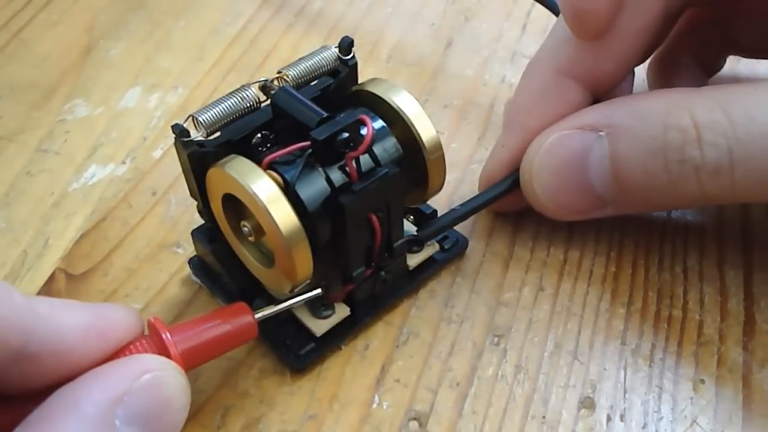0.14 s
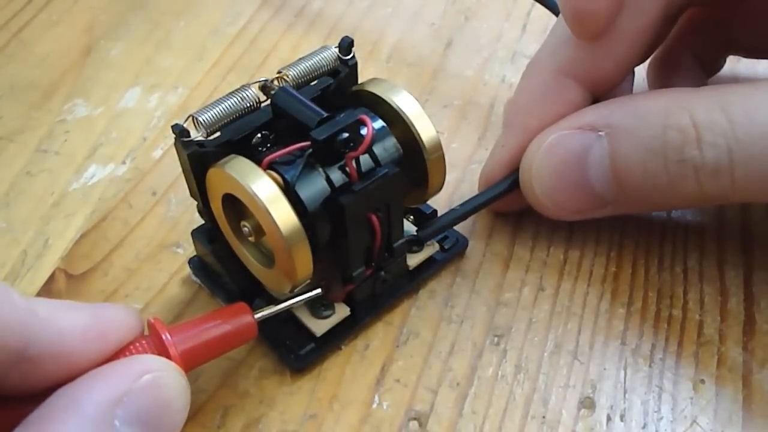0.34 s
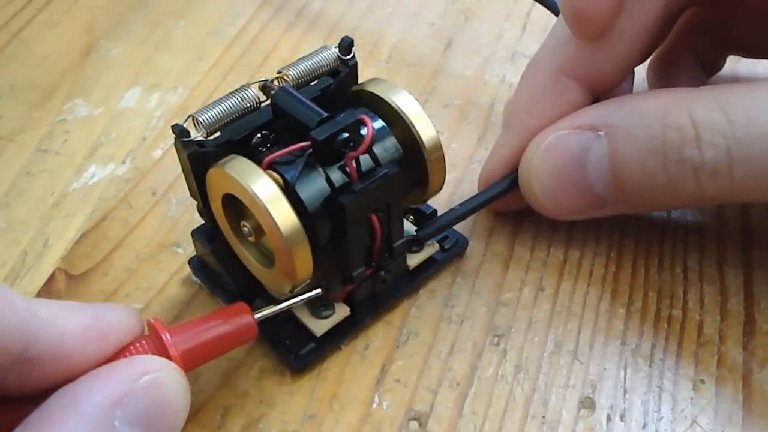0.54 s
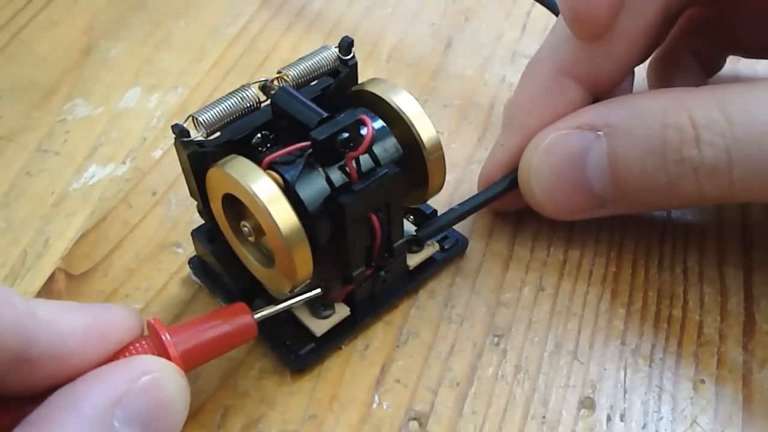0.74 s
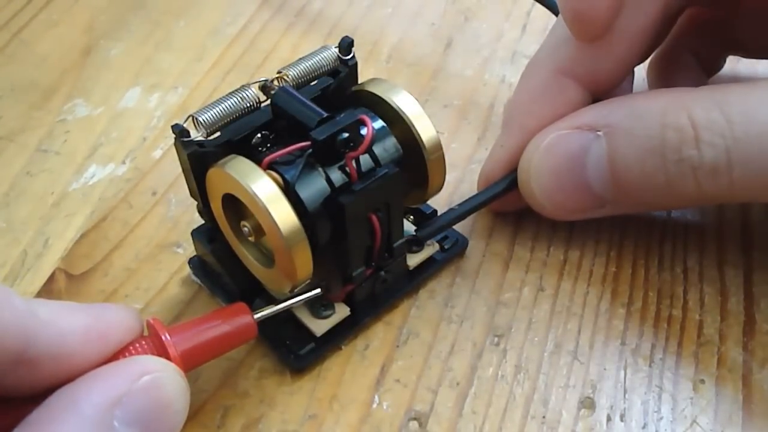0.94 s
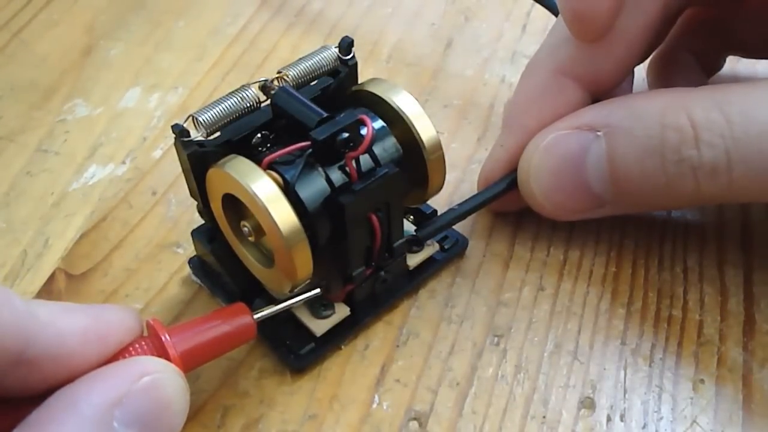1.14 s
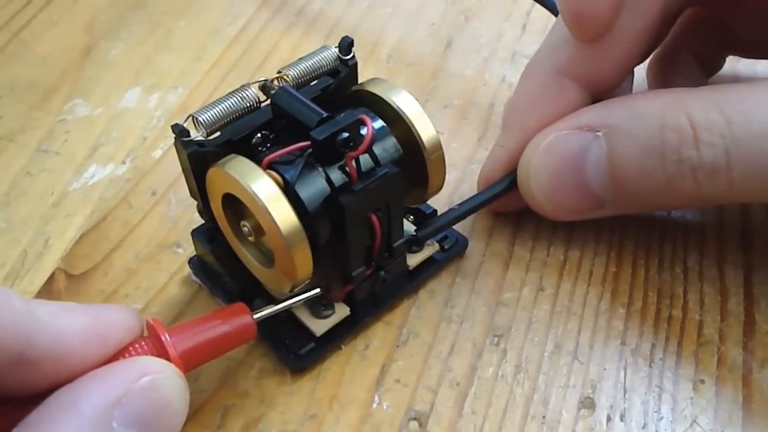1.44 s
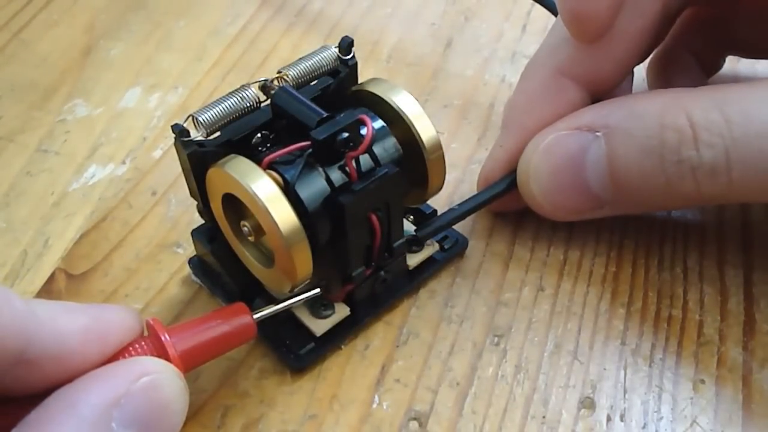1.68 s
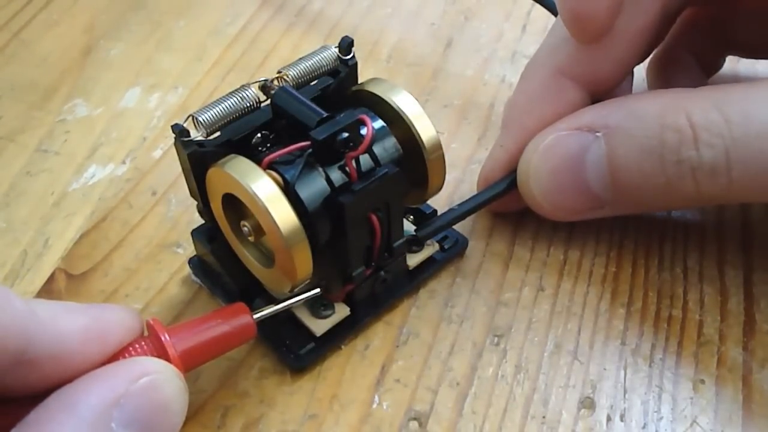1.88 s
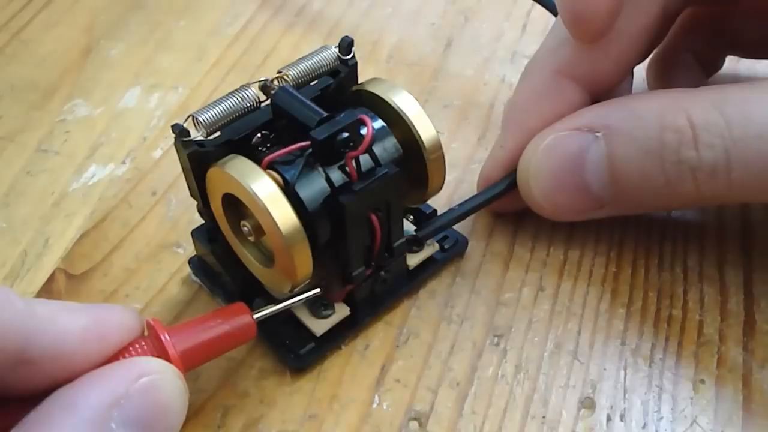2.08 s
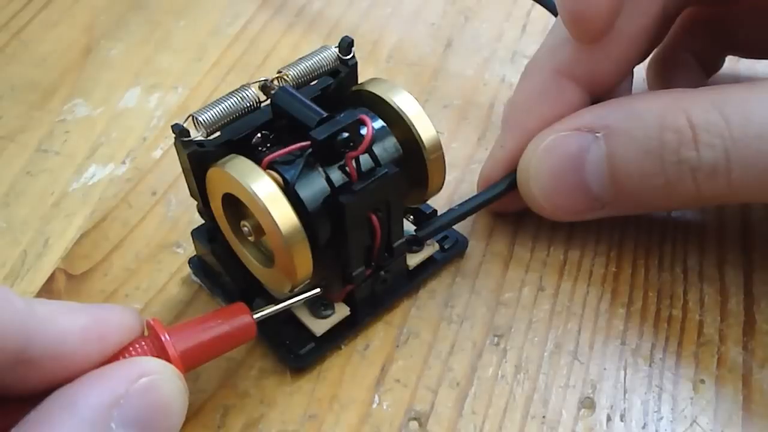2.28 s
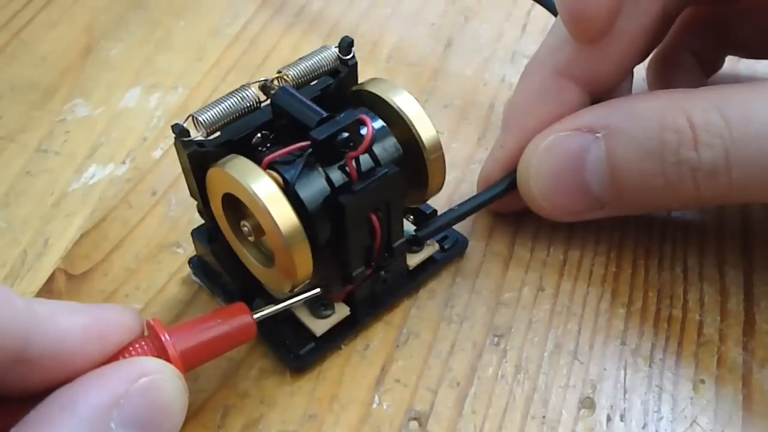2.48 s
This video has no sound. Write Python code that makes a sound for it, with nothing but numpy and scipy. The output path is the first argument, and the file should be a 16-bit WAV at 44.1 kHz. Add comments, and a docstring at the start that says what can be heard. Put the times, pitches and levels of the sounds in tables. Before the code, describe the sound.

High, scratchy whirr of a small electric motor gradually speeding up on a wooden table.

```python
"""A small twin electric motor, fed through hand-held probes, spins up two brass flywheels on a wooden table.
From the start the bearings rumble and the brushes chatter once a turn. As the rotors gain speed, their
shaft orders climb through the resonances of frame and table, and the commutator's grain gives the brush
rasp broad rising bands that flare as they cross the ringing of the metal near 6 kHz. Near 1.7 s the fast
rotor's second order swells to its peak, then recedes while both rotors go on accelerating."""
import sys
import numpy as np
from scipy import signal
from scipy.fft import rfft, irfft, next_fast_len
from scipy.io import wavfile
from scipy.ndimage import map_coordinates

SR = 44100
rng = np.random.default_rng(int(sys.argv[2]) if len(sys.argv) > 2 else 0)


def inscribe(sig):
    """Save sig as 16-bit PCM at rate SR to the path in sys.argv[1].

    A 1-D sig is mono; a 2-D sig holds one channel per row.
    Samples are clipped to [-1, 1] before scaling.
    """
    pcm = np.round(np.clip(np.atleast_2d(sig).T, -1, 1) * 32767)
    wavfile.write(sys.argv[1], SR, pcm.astype(np.int16))


N = 115542


def amp(db):
    """Decibels to amplitude ratio."""
    return 10 ** (np.asarray(db) / 20)


def unit(x):
    """Normalisation to rms 1."""
    return x / np.sqrt(np.mean(x ** 2) + 1e-20)


def along(points, hz):
    """Interpolation on a logarithmic frequency axis."""
    f, v = np.transpose(points)
    return np.interp(np.log(hz + 1), np.log(f + 1), v)


def curves(rows):
    """Linear interpolation in time, one curve per value column."""
    times, *columns = np.transpose(rows)
    return [np.interp(np.arange(N) / SR, times, c) for c in columns]


def wobble(rate):
    """Smooth random modulation, rate knots a second."""
    return map_coordinates(rng.standard_normal(4096), [np.arange(N) * rate / SR], mode="wrap")


def filtered(x, response):
    """Linear filtering: the spectrum times a frequency response."""
    m = next_fast_len(N + SR // 2)
    return irfft(rfft(x, m) * response(np.fft.rfftfreq(m, 1 / SR)), m)[:N]


def coloured(x, spectrum):
    """Spectral shaping by (Hz, dB) points, at rms 1."""
    return unit(filtered(x, lambda hz: amp(along(spectrum, hz))))


def resonate(x, modes):
    """Resonance: steep-sided modes ring on after each burst, at rms 1."""
    def response(f):
        power = sum(amp(db) ** 2 / (1 + ((f - hz) / width) ** 2) ** 2 for hz, width, db in modes)
        high_pass = f ** 2 / (f ** 2 + 1500 ** 2)
        cepstrum = irfft(np.log(power * high_pass + 1e-12))
        cepstrum[0] = cepstrum[len(cepstrum) // 2:] = 0  # minimum phase, hence causal
        return np.exp(rfft(cepstrum))
    return unit(filtered(x, response))


def room(x, t60_s=0.14):
    """Reverberation: a small room's diffuse tail decays exponentially."""
    t = np.arange(SR // 3) / SR
    tail = rng.standard_normal(len(t)) * amp(-60 * t / t60_s)
    return signal.fftconvolve(x, tail / np.linalg.norm(tail))[:N]


# Bearing rumble. Each row: time in seconds, level in dB.
RUMBLE_LEVEL = [(0.0, -41), (0.07, -44), (0.31, -40), (0.69, -45), (0.86, -42.5), (0.92, -42.5),
                (2.57, -48), (2.62, -47.5)]
# Its spectrum. Each row: frequency in Hz, relative level in dB.
RUMBLE_SPECTRUM = [(25, -33), (40, -25), (55, -21), (75, -23), (100, -10), (200, -12), (320, -7),
                   (420, -5.5), (550, 0.5), (800, 1.5), (1000, -4.5), (1200, 2.5), (1400, 7), (1700, -4),
                   (1920, 1.5), (2150, -2), (2500, 3), (3500, -34.5)]

def bearings():
    """Structure-borne sound: rolling noise is carried into the table top."""
    return amp(curves(RUMBLE_LEVEL)[0]) * coloured(rng.standard_normal(N), RUMBLE_SPECTRUM)


# Shaft orders of each rotor. Each row: multiple of the rotation rate, relative level in dB.
SLOW_ROTOR_ORDERS = [(3, -56.5), (4, -78), (6, -57), (9, -56), (12, -64.5), (18, -61)]
FAST_ROTOR_ORDERS = [(1, -54), (4, -59), (5, -52.5), (6, -61), (7, -56.5), (8, -66)]
# Radiation from frame and table. Each row: frequency in Hz, gain in dB.
FRAME_RESPONSE = [(165, -7), (220, -16), (240, -9), (255, -4), (275, -7), (350, -10), (410, 3), (455, -7),
                  (500, 6), (530, 6), (550, -1), (610, -2), (650, 5), (720, -3), (830, 1), (880, 0),
                  (935, 3), (990, -11), (1110, 1), (1220, -1), (1280, -5), (1430, 2), (1610, -1),
                  (1660, -11), (2100, -9), (3500, 1)]

def rotor(speed_hz, orders, reference_hz, flutter_db, wander_rad):
    """Forced vibration: shaft harmonics grow with speed and radiate through the frame's resonances."""
    angle = 2 * np.pi * np.cumsum(speed_hz) / SR + wander_rad * wobble(20)
    drive_db = 8 * np.log2(speed_hz / reference_hz)  # 8 dB per octave
    sound = np.zeros(N)
    for order, db in orders:
        level_db = db + drive_db + along(FRAME_RESPONSE, order * speed_hz) + flutter_db * wobble(18)
        sound += np.sqrt(2) * amp(level_db) * np.sin(order * angle + rng.uniform(0, 2 * np.pi))
    return sound


# Fast rotor's strongest orders, swelling at table resonances. Each row: time in seconds, level in dB.
SECOND_ORDER_LEVEL = [(0, -65), (.3, -66), (.5, -54), (.8, -54), (1.15, -63), (1.42, -55), (1.6, -45.5),
                      (1.74, -42.7), (1.88, -46), (1.97, -51), (2.4, -50), (2.62, -54)]
THIRD_ORDER_LEVEL = [(0, -55), (.2, -58), (.36, -52), (.65, -58), (.84, -48), (1.05, -51), (1.3, -58),
                     (2, -61), (2.28, -53), (2.45, -58), (2.62, -57)]

def hum(speed_hz, order, levels, flutter_db):
    """Amplitude modulation: one shaft harmonic follows a prescribed swell."""
    angle = 2 * np.pi * np.cumsum(speed_hz) / SR
    level_db = curves(levels)[0] + flutter_db * wobble(20)
    return np.sqrt(2) * amp(level_db) * np.sin(order * angle + .06 * wobble(20))


def contact(speed_hz, sharpness, scatter_db, jitter_turns):
    """Quasi-periodic force: one bump a turn, irregular in size and timing."""
    turns = np.cumsum(speed_hz) / SR
    size, shift = rng.standard_normal((1024, 2))[turns.astype(int)].T
    angle = 2 * np.pi * (turns - .5 + jitter_turns * shift)
    bumps = np.exp(sharpness * (np.cos(angle) - 1))
    return unit(amp(scatter_db * np.clip(size, -2, 2)) * bumps)


# Commutator roughness. Each row: ripples per turn of the slow rotor, gain in dB.
COMMUTATOR_GRAIN = [(16, -2), (19, -2.5), (20.5, 1.5), (21.7, -2.5), (23.3, 1), (24.6, 0), (26.8, 2.5),
                    (29, -2), (31.6, 3.5), (32.7, 4), (34.5, -1.5), (36, -.5), (37.4, 3.3), (39.3, -.5),
                    (42, 1), (44, -1.5), (47.5, 1), (53, -1.5), (56, 1), (58.5, -1), (61, 1), (64, -1),
                    (67, 0)]

def scrape(force, speed_hz, pulsed_share):
    """Sliding friction: noise pulses with the force, in bands at ripple count times rotation rate."""
    noise = rng.standard_normal(N) * np.sqrt(1 - pulsed_share + pulsed_share * force ** 2)
    hz, t, spectra = signal.stft(noise, SR, nperseg=1024)
    per_turn = hz[:, None] / np.interp(t, np.arange(N) / SR, speed_hz)
    return signal.istft(spectra * amp(along(COMMUTATOR_GRAIN, per_turn)), SR, nperseg=1024)[1][:N]


# Brush hiss. Each row: time in seconds, relative level in dB.
HISS_LEVEL = [(0.0, -36.5), (0.05, -36), (0.35, -32.5), (0.92, -32), (1.02, -32.5), (1.6, -34),
              (1.79, -31.5), (2.37, -34), (2.62, -34.5)]
# Filter for the hiss, strongest near 7 kHz and fading above; its 11.5 kHz dip is not the brushes' sound.
# Each row: frequency in Hz, relative gain in dB.
HISS_FILTER = [(1500, -35), (5000, -17), (6500, -6), (6980, 1), (7170, 0.5), (7280, 1.5), (7450, 1.5),
               (8000, -9.5), (8750, -7), (9500, -10), (10200, -19.5), (10600, -11), (11500, -48.5),
               (13400, -25.5), (15000, -30), (15700, -44)]

def hiss(force, speed_hz, gain_db=1):
    """Filtered friction noise, strongest near 7 kHz."""
    friction = scrape(force, speed_hz, pulsed_share=0.32)
    return amp(gain_db + curves(HISS_LEVEL)[0]) * coloured(friction, HISS_FILTER)


# Brush rasp. Each row: time in seconds, level in dB.
RASP_LEVEL = [(0, -33.5), (.06, -33.5), (.22, -33), (.31, -30), (.44, -31.5), (.52, -27), (.6, -29.5),
              (.78, -30.5), (1.12, -29.7), (1.18, -33.5), (1.27, -30), (1.6, -31.5), (1.8, -31.5),
              (2.05, -32), (2.18, -34), (2.33, -33), (2.5, -35.3), (2.62, -35.5)]
# Housing resonances. Each row: frequency in Hz, width in Hz, relative level in dB.
HOUSING_MODES = [(2370, 88, -28), (2770, 110, -6), (2990, 164, -5.5), (3385, 470, -6), (3988, 280, 1),
                 (4120, 160, -1.5), (4463, 148, -3), (4635, 280, -8), (5340, 310, -5.5)]

def rasp(force, speed_hz):
    """Source and filter: brush friction drives the housing's resonances."""
    friction = scrape(force, speed_hz, pulsed_share=0.42)
    return amp(curves(RASP_LEVEL)[0]) * resonate(friction, HOUSING_MODES)


# Brush chatter. Each row: time in seconds, level in dB.
CHATTER_LEVEL = [(0, -18), (.02, -23.5), (.06, -26.5), (.22, -27), (.32, -23), (.43, -26.5), (.54, -19.5),
                 (.7, -22.5), (.95, -24.5), (1.32, -23.5), (1.37, -27.5), (1.5, -26), (1.63, -29.5),
                 (1.78, -28.5), (1.84, -22.5), (1.96, -23), (2.14, -22.5), (2.38, -24), (2.46, -26),
                 (2.62, -27)]
# Ringing metal. Each row: frequency in Hz, width in Hz, relative level in dB.
METAL_MODES = [(5714, 133, -7.5), (6078, 220, -2), (6380, 180, -6), (6540, 53, -4.5)]

def chatter(force, speed_hz):
    """Modal excitation: a friction burst each turn rings the metal near 6 kHz."""
    friction = scrape(force, speed_hz, pulsed_share=0.44)
    return amp(curves(CHATTER_LEVEL)[0]) * resonate(friction, METAL_MODES)


def brushes(slow_hz, fast_hz):
    """Contact excitation: the brushes chatter, rasp and hiss under a slightly wavering pressure."""
    slow_force = contact(slow_hz, sharpness=1.6, scatter_db=1.5, jitter_turns=0.066)
    fast_force = contact(fast_hz, sharpness=1.3, scatter_db=2.5, jitter_turns=0.2)
    both = unit(np.hypot(slow_force, 1.34 * fast_force))
    pressure = amp(0.29 * wobble(25.43))
    return pressure * (chatter(slow_force, slow_hz) + rasp(both, slow_hz) + hiss(both, slow_hz))


# Spin-up. Each row: time in seconds, slow and fast rotation rates in Hz.
ROTOR_SPEEDS = [(0, 114.9, 163.2), (.4, 133.7, 186.9), (.8, 153.7, 213), (1.2, 168.4, 232.7),
                (1.6, 178.9, 246.9), (2, 186.7, 258.5), (2.62, 198.6, 272.7)]

def scene():
    """Superposition: rotor tones add to the whirr of brushes and bearings and its reverberation."""
    slow_hz, fast_hz = curves(ROTOR_SPEEDS)
    slow = rotor(slow_hz, SLOW_ROTOR_ORDERS, reference_hz=183, flutter_db=3.5, wander_rad=0.041)
    fast = rotor(fast_hz, FAST_ROTOR_ORDERS, reference_hz=263, flutter_db=1.45, wander_rad=0.029)
    second = hum(fast_hz, 2, SECOND_ORDER_LEVEL, flutter_db=0.8)
    third = hum(fast_hz, 3, THIRD_ORDER_LEVEL, flutter_db=0.3)
    whirr = brushes(slow_hz, fast_hz) + bearings()
    return (slow + fast + second + third + whirr + amp(-12) * room(whirr))[None]


def record(dry):
    """Band limiting: an ideal low-pass at 15650 Hz."""
    return np.array([filtered(ch, lambda hz: hz < 15650) for ch in dry])


dry = scene()
out = record(dry)
inscribe(out)
```